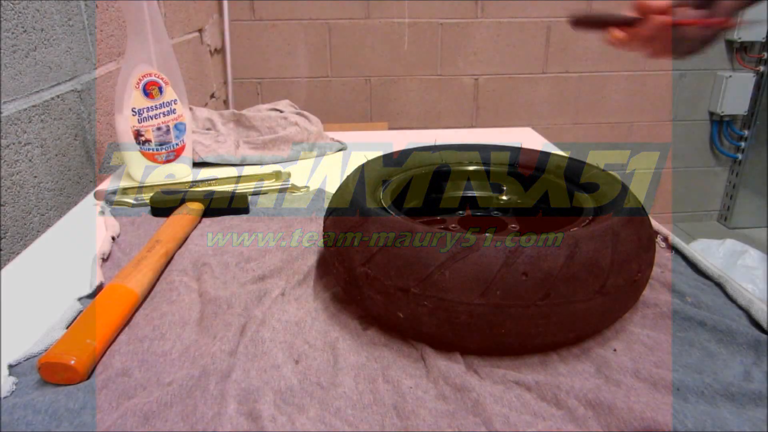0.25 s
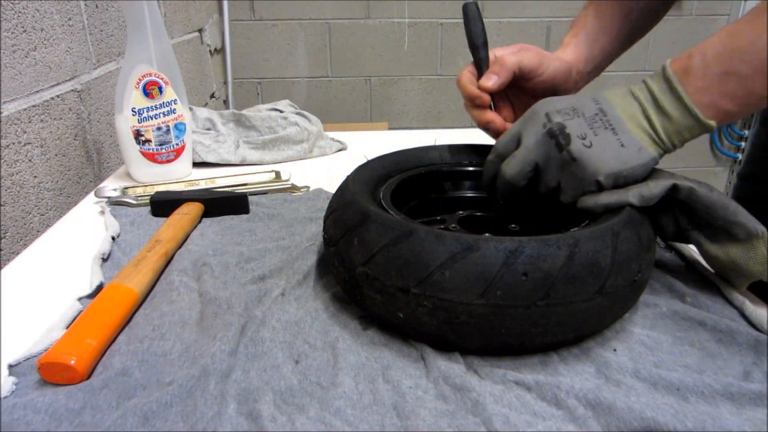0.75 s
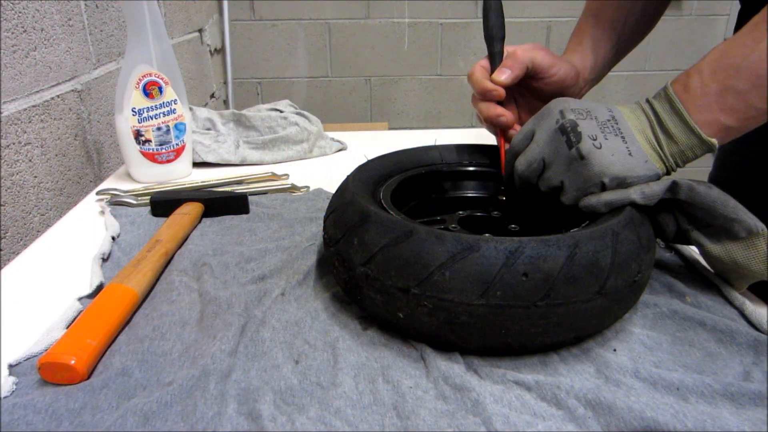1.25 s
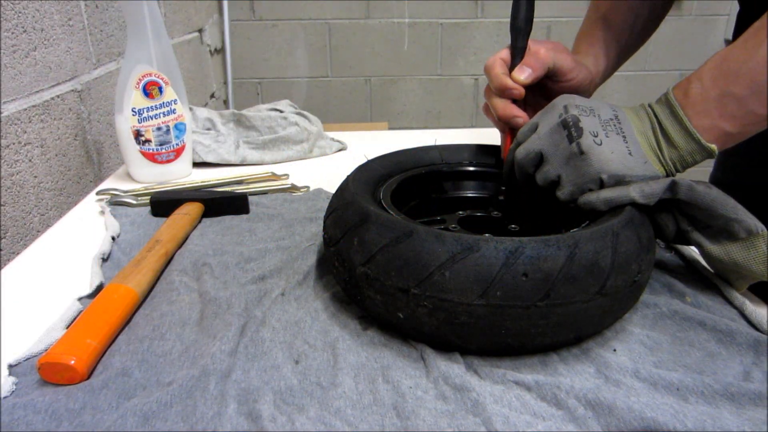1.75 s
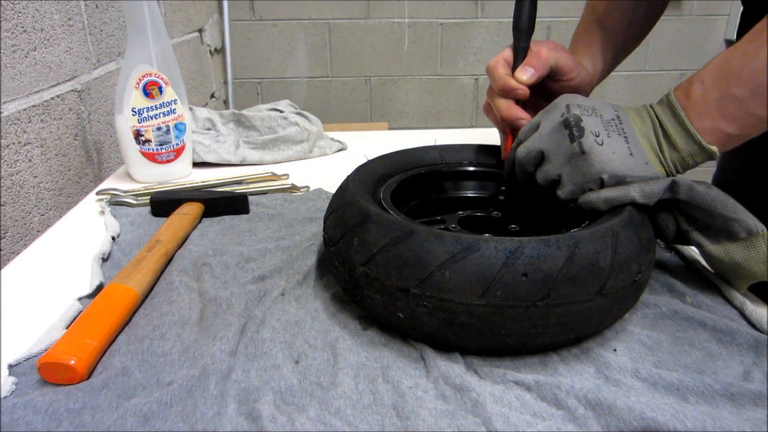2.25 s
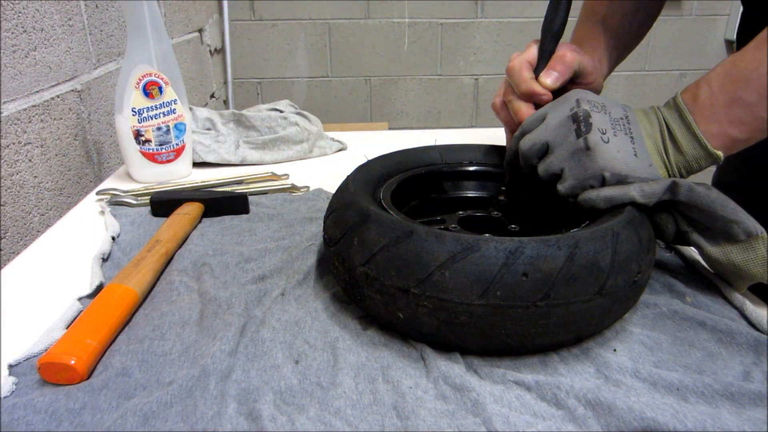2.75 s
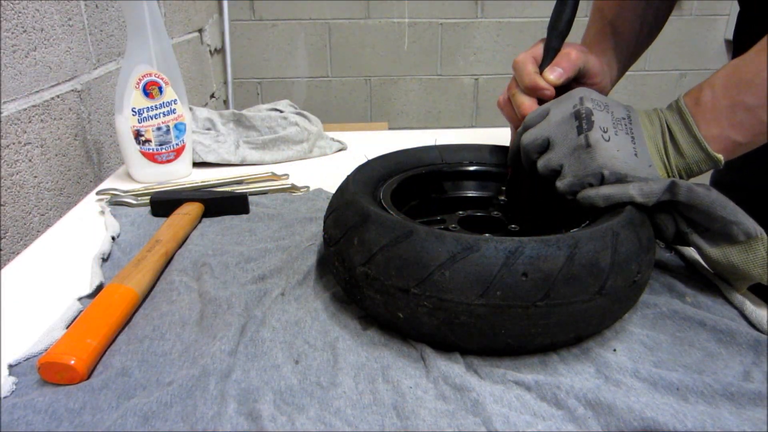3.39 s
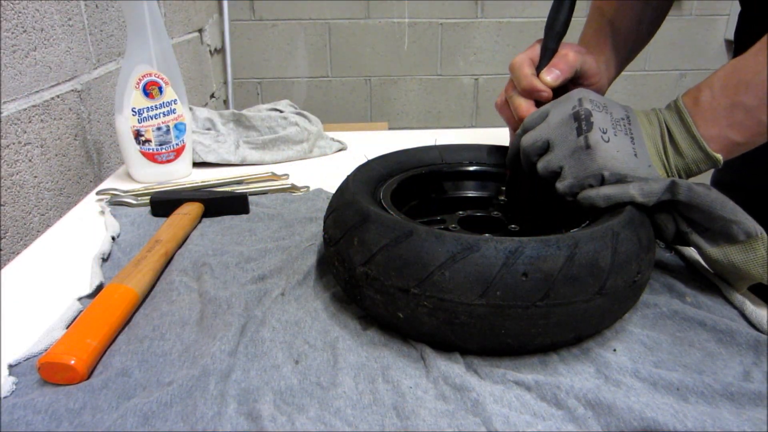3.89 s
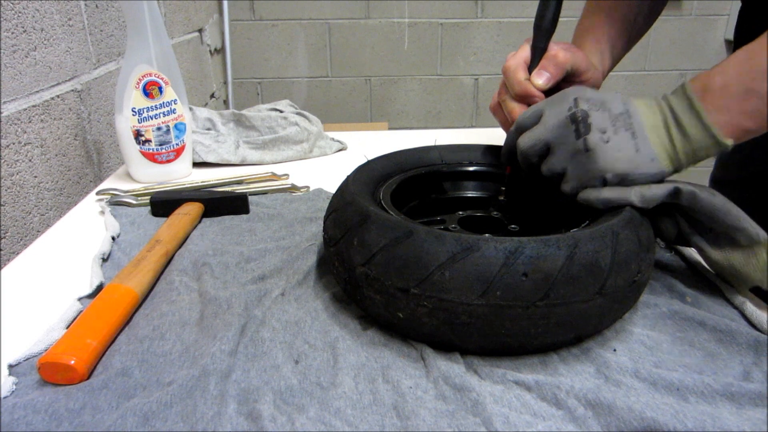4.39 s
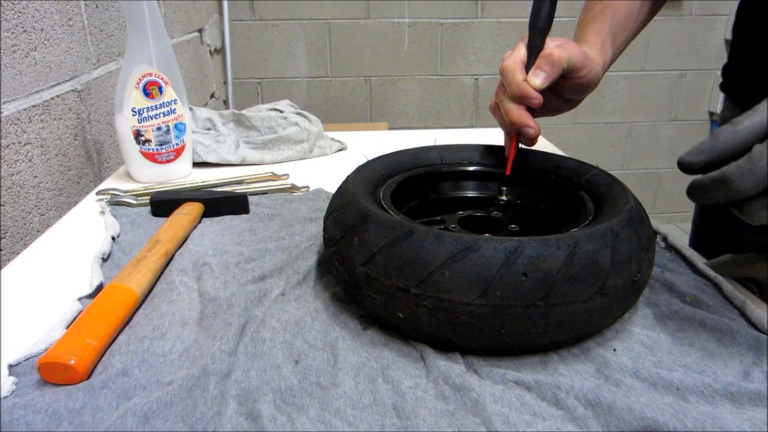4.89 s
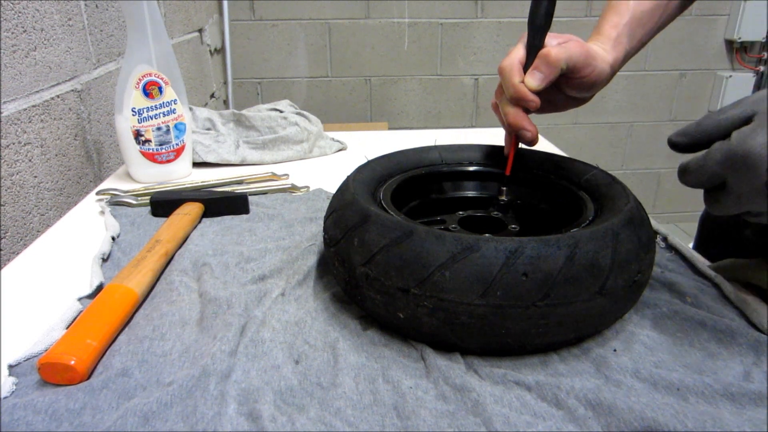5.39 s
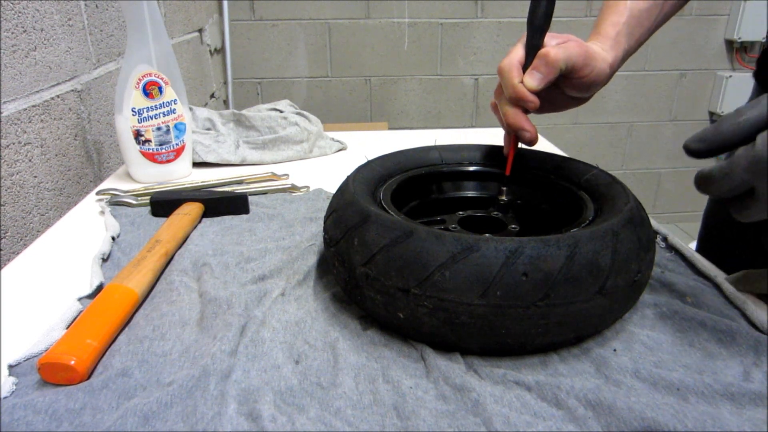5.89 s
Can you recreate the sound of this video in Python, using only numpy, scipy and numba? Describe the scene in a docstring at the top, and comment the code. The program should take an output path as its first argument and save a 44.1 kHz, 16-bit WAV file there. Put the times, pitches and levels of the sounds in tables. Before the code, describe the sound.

Low ventilation hum, a soft rustle, a hard double knock on a metal rim, then a squeezed hiss and a long rush of escaping air.

```python
"""Ventilation rushes and hums throughout, as filtered noise and wavering sines; cloth rustles first, as noise.
At 0.7 s a tool knocks on the wheel of a small tyre: cracks, rattle, thuds and ringing rim modes. Small noise
ticks accompany the first contacts and follow the loud knock, as the tool touches wheel and valve; that knock
makes the recorder turn its gain down for a moment. Air spits at 1.8 s, hisses past the tool from 2.1 s while the
core is unscrewed, then blows freely from 3.75 s: turbulence noise through a moving resonant high-pass."""
import sys
import numpy as np
from scipy import signal
from scipy.fft import rfft, irfft
from scipy.io import wavfile
from scipy.ndimage import uniform_filter1d
from numba import njit

SR = 44100
rng = np.random.default_rng(int(sys.argv[2]) if len(sys.argv) > 2 else 0)


def output_pcm(signal):
    """Save a mono or channel-first signal as 16-bit PCM at the path in sys.argv[1].

    Samples are clipped to [-1, 1] before scaling.
    """
    pcm = np.clip(np.atleast_2d(signal).T, -1, 1) * 32767
    wavfile.write(sys.argv[1], SR, np.round(pcm).astype(np.int16))


N = 270774
TIME = np.arange(N) / SR   # s
FREQS = np.maximum(np.fft.rfftfreq(N, 1 / SR), 1)   # Hz
SIDES = np.array([[1], [-1]])   # left, right

# Ventilation rush. Each row: frequency in Hz, relative density in dB per Hz.
AIR_SPECTRUM = [(25, -23.5), (45, -20.5), (70, -9), (92, -8.5), (145, -1.5), (263, -13), (500, -18),
                (750, -21), (1400, -26), (2500, -40), (4500, -49.5), (8000, -55.5), (10000, -63),
                (16000, -69)]
# Mains and fan tones. Each row: frequency in Hz, rms level in dB, unsteadiness from 0 to 1.
HUM_TONES = [(99.6, -36.5, 0.06), (141.35, -34.5, 0.37), (242.8, -52.5, 1), (399.6, -51, 0)]
# Sleeves and gloves moving in. Each row: fully on in s, stops in s, 60 dB rise time in s, level in dB.
CLOTH_MOVES = [(.08, .11, .9, -57), (.25, .34, 0.072, -46), (0.688, .8, .45, -52)]
# Cloth noise. Each row: frequency in Hz, relative density in dB per Hz.
CLOTH_SPECTRUM = [(400, -11), (1200, -10), (1800, 1), (2600, -11), (4000, -20.5), (7000, -22.5),
                  (10000, -32), (16000, -40.5)]
# Contacts with the wheel. Each row: start in s, strength in dB, softness as low-pass in Hz.
WHEEL_CONTACTS = [(0.72, -16.5, 760), (.742, -27.5, 540), (.832, -5.5, 3400), (.853, -3, 1840),
                  (0.8642, -4, 2190), (0.875, -4.5, 2280)]
# Ringing modes of the wheel. Each row: frequency in Hz, relative level in dB, t60 in s.
WHEEL_MODES = [(296, -9, 0.32), (396, -14.5, 0.16), (467, -12, .25), (534, -0.5, 0.225), (624, -3.5, 0.22),
               (762, 4.5, 0.17), (852, -14.5, 0.47), (1050, -9, 0.15), (1180, 3, 0.11), (1240, 4, 0.2),
               (1317, -7.5, 0.29), (1350, -8.5, 0.49), (1464, 4, 0.13), (1516, 6.5, 0.21), (1580, 4, 0.31),
               (1544, -3, 0.23), (1713, -4.5, .25), (1770, -5.5, 0.17), (2130, -18, 0.28),
               (2370, -15, 0.23), (2700, -23.5, 0.45), (2960, -9, .26), (2940, -17.5, 0.24),
               (3252, -15, .3), (4097, -29.5, .22), (4850, -8, 0.38), (7150, -9, .27)]
# Tool touching wheel and valve. Each row: start in s, relative level in dB, upper band edge in Hz.
TOOL_TICKS = [(0.7294, -23, 10800), (.741, -30, 9000), (0.936, -24, 10000), (0.958, -31, 10000),
              (1.0612, -26, 6960), (1.07, -24, 7000), (1.077, -22, 7460), (1.262, -37, 6950)]
# Spit, half-open hiss, free blow. Each row: fully on in s, shuts in s, 60 dB rise time in s,
# 60 dB fall time in s, relative level in dB, sag in dB per s (negative grows).
AIR_RELEASES = [(1.785, 1.825, .095, .04, -40, -9), (2.138, 3.204, 0.096, .02, -27.5, -1),
                (3.751, 6.15, 0.021, .02, -25.5, 2.5)]
# Jet turbulence. Each row: frequency in Hz, relative density in dB per Hz.
JET_SPECTRUM = [(500, -14), (1100, -12.5), (1500, -10), (2100, -10), (2600, -7), (3500, -9), (5500, -7),
                (7000, -6.5), (8700, -1), (9700, 1.5), (10300, -3.5), (11000, 1.5), (13000, 1), (14100, 1),
                (16000, -8)]
# Peaks and hollows of the valve stem and rim dish. Each row: frequency in Hz, width in Hz, gain in dB.
STEM_RESONANCES = [(1020, 150, -3), (1550, 180, -4), (1880, 110, 6.5), (2090, 120, 2), (2250, 150, -5),
                   (2700, 350, 1), (3500, 300, -2), (3900, 250, 2), (4540, 260, 4), (5280, 220, 4),
                   (5900, 350, 2), (6870, 200, -3), (7190, 130, 3), (8000, 220, 5), (8340, 130, -4),
                   (8750, 250, 2), (9350, 600, 3), (10220, 250, -4), (10800, 400, 2)]
# Gap between valve, tool and glove; it narrows and widens again as the core is unscrewed.
# Each row: time in s, pitch in Hz, quality factor.
UNSCREWING_GAP = [(2.15, 2720, 0.77), (2.25, 3240, 1.56), (2.55, 3480, 1.4), (2.63, 4500, 0.68),
                  (2.69, 5060, 1.95), (3.07, 5320, 1.65), (3.105, 4070, 1.3), (3.15, 3230, 1.02),
                  (3.2, 2730, 1.1)]
# It closes briefly as the core comes free, then stays wide and rings less while the glove lets go.
# Each row: time in s, pitch in Hz, quality factor.
BLOWING_GAP = [(3.81, 2730, 0.56), (3.845, 5020, 1.1), (3.87, 2040, 0.83), (3.97, 1790, 1.3),
               (4.6, 1880, 1.46), (4.67, 1530, .7), (4.95, 1803, 1.08), (6.14, 1600, 1.3)]
# Hands steering the jet. Each row: time in s, shift to the left in dB, gain above 12 kHz in dB.
JET_AIM = [(2.1, -.7, -2.5), (2.55, 0.5, 1.5), (2.63, -1, -4), (3.05, 3, -2), (3.8, 0.5, -3),
           (4.0, 1.5, -4), (5.0, -0.5, -6)]
# Early echoes off rim, bench and wall. Each row: delay in s, gain in dB.
EARLY_ECHOES = [(.0033, -28), (.0047, -30.5), (.0071, -20.5), (0.011, -22.5)]
# Reverberation time. Each row: frequency in Hz, t60 in s.
ROOM_DECAY = [(100, 0.62), (1000, 0.35), (4000, 0.41), (8000, 0.25), (16000, 0.15)]
# Stereo balance. Each row: frequency in Hz, left minus right in dB.
STEREO_BALANCE = [(60, -7.5), (200, -8.5), (380, -10.5), (700, -9), (1300, -8), (2400, -6), (4400, -4.5),
                  (8100, -4.5), (15000, -8)]
# A tighter gap throws a stronger jet.
SQUEEZE_DB_PER_OCTAVE, RESTING_GAP_HZ = 4, 2700


def from_db(db):
    """Decibels to amplitude gain."""
    return 10 ** (np.asarray(db) / 20)


def rms_one(x):
    """Scale to unit power."""
    return x / np.sqrt(np.mean(x ** 2) + 1e-20)


def in_time(rows):
    """Interpolate each column of a curve at every sample."""
    s, *columns = np.transpose(rows)
    return [np.interp(TIME, s, column) for column in columns]


def at_hz(points, hz):
    """Read a curve on a log-frequency axis."""
    at, value = np.transpose(points)
    return np.interp(np.log(hz), np.log(at), value)


def butter(x, hz, kind, order=2):
    """Causal Butterworth filter."""
    edges_hz = np.clip(hz, 10, .45 * SR)
    return signal.sosfilt(signal.butter(order, edges_hz, kind, fs=SR, output="sos"), x + 1e-18)


def noise(spectrum_db):
    """Gaussian noise of unit power, shaped by a spectrum in dB."""
    spectrum = rfft(rng.standard_normal(N)) * from_db(spectrum_db)
    return rms_one(irfft(spectrum, N))


def drift(corner_hz):
    """Slow random wander of unit spread."""
    return noise(-20 * np.log10(1 + (FREQS / corner_hz) ** 2))


def burst(s, t60_s):
    """Envelope that jumps up at time s and decays exponentially."""
    return (TIME >= s) * from_db(-60 * np.abs(TIME - s) / t60_s)


def swell(on_s, off_s, rise_s, fall_s):
    """Envelope that climbs 60 dB in rise_s, holds from on_s to off_s and drops 60 dB in fall_s."""
    before = np.maximum(on_s - TIME, 0) / rise_s
    after = np.maximum(TIME - off_s, 0) / fall_s
    return from_db(-60 * (before + after))


def workshop(x, wet_db):
    """Direct sound, early echoes and a diffuse tail that dies band by band, partly alike left and right."""
    t, tail = TIME[:SR // 2], 0
    edges_hz = np.geomspace(60, 19000, 10)
    for low, high in zip(edges_hz, edges_hz[1:]):
        mid, side = butter(rng.standard_normal((2, len(t))), [low, high], "band")
        t60_s = at_hz(ROOM_DECAY, np.sqrt(low * high))
        tail = tail + (mid + from_db(-3.0) * side * SIDES) * from_db(-60 * t / t60_s)
    response = from_db(wet_db) * rms_one(tail * (t > .004)) / np.sqrt(len(t))
    for delay_s, db in EARLY_ECHOES:
        response[:, round(delay_s * SR)] += from_db(db)
    return x + signal.fftconvolve(x[None], response, axes=1)[:, :N]


def ventilation(rush_db=-32.5, side_db=-13, rumble_db=-57):
    """Dull broadband rush, deep rumble that differs from side to side, mains hum and wavering fan tones."""
    colour = at_hz(AIR_SPECTRUM, FREQS)
    side_tilt_db = np.clip(3 * np.log2(FREQS / 200), -3, 5)
    rush = noise(colour) + from_db(side_db) * noise(colour + side_tilt_db) * SIDES
    rumble = rms_one(butter(rng.standard_normal((2, N)), [20, 90], "band"))
    hum = 0
    for hz, db, unsteady in HUM_TONES:
        # complex wander moves both amplitude and phase
        waver = 1 + unsteady * (drift(1.84) + 1j * drift(0.83))
        waver = waver / np.sqrt(1 + 2 * unsteady ** 2)
        carrier = np.exp(2j * np.pi * (hz * TIME + rng.random()))
        hum = hum + np.sqrt(2) * from_db(db) * np.real(waver * carrier)
    return from_db(rush_db) * rush + from_db(rumble_db) * rumble + hum


def rustle(fall_s=0.77):
    """Cloth friction: coloured noise that swells and fades with each movement."""
    motion = sum(from_db(db) * swell(on, off, rise, fall_s) for on, off, rise, db in CLOTH_MOVES)
    return workshop(motion * noise(at_hz(CLOTH_SPECTRUM, FREQS)), wet_db=-5)


def wheel(ring_db=-11, crack_db=12, crack_t60_s=0.0088, rattle_db=-6.5, rattle_t60_s=0.25,
          thud_db=-6, thud_t60_s=0.32):
    """Each contact gives a short crack, a rattle and a tyre thud, and sets the rim modes ringing."""
    out, t = np.zeros(N), TIME[:SR]
    ring = 0
    for hz, db, t60_s in WHEEL_MODES:
        ring = ring + rng.choice([-1, 1]) * from_db(db - 60 * t / t60_s) * np.sin(2 * np.pi * hz * t)
    # two heavily damped resonances
    crack = sum(from_db(db) * np.cos(2 * np.pi * hz * t) for hz, db in [(1050, -5), (2000, -6)])
    crack = crack * from_db(-60 * t / crack_t60_s)
    for s, db, soft_hz in WHEEL_CONTACTS:
        rattle = rms_one(butter(rng.standard_normal(SR), [900, 2600], "band"))
        rattle = rattle * from_db(-60 * t / rattle_t60_s)
        thud = rms_one(butter(rng.standard_normal(SR), [200, 600], "band"))
        thud = thud * from_db(-60 * t / thud_t60_s)
        blow = from_db(ring_db) * ring + from_db(crack_db) * crack + from_db(rattle_db) * rattle
        # a soft contact presses longer, so more of it goes into the thud
        thud_gain = from_db(thud_db) * 600 / soft_hz
        at = round(s * SR)
        out[at:at + SR] += from_db(db) * (butter(blow, soft_hz, "low") + thud_gain * thud)
    return workshop(out, wet_db=-8.5)


def ticks(t60_s=0.0067, gain_db=-7):
    """Small contacts of the tool with wheel and valve: band-limited noise bursts."""
    white = rng.standard_normal(N)
    out = np.zeros(N)
    for s, db, top_hz in TOOL_TICKS:
        grain = rms_one(butter(white, [2600, top_hz], "band"))
        out += from_db(db + gain_db) * burst(s, t60_s) * grain
    return workshop(out, wet_db=-5)


def airflow(gap_hz):
    """Each release swells, sags or grows, and shuts; a tight gap strengthens the jet."""
    flow = 0
    for on, off, rise, fall, db, sag in AIR_RELEASES:
        level_db = db - sag * np.maximum(TIME - on, 0)
        flow = flow + swell(on, off, rise, fall) * from_db(level_db)
    return flow * from_db(SQUEEZE_DB_PER_OCTAVE * np.log2(gap_hz / RESTING_GAP_HZ))


@njit
def resonant_highpass(x, step, quality):
    """State-variable high-pass whose pitch and sharpness move: the gap rings and weakens what lies below."""
    out, band, low = np.zeros(len(x)), 0., 0.
    for i in range(len(x)):
        g, loss = step[i], 1 / quality[i]
        out[i] = (x[i] - (loss + g) * band - low) / (1 + g * (g + loss))
        low += 2 * g * (band + g * out[i])
        band += 2 * g * out[i]
    return out


def jet(colour, gap_hz, quality, lift_db, leak_db=-6.0, level_db=0.5):
    """Turbulence forced through the gap, plus a dull leak round it; the flow sets its bright strength."""
    step = np.tan(np.pi * gap_hz / SR)
    past_gap = noise(colour)
    for _ in range(2):   # two stages: steep below the pitch
        past_gap = resonant_highpass(past_gap, step, quality)
    hiss = past_gap + from_db(leak_db) * butter(noise(colour), 5100, "low")
    treble = irfft(rfft(hiss) * (FREQS > 12000), N)
    hiss = hiss + (from_db(lift_db) - 1) * treble
    # hold the bright core to the flow, whatever the gap does below it
    core = np.sqrt(uniform_filter1d(butter(hiss, [7000, 11000], "band") ** 2, size=2000))
    return hiss / core * airflow(gap_hz) * from_db(level_db)


def valve(flutter_db=0.5, spread_db=-12):
    """Escaping air: jet turbulence coloured by the stem and by the changing gap, steered by the hands."""
    colour = at_hz(JET_SPECTRUM, FREQS)
    for hz, width_hz, db in STEM_RESONANCES:
        colour = colour + db / (1 + (2 * (FREQS - hz) / width_hz) ** 2)
    gap_hz, quality = in_time(UNSCREWING_GAP + BLOWING_GAP)
    pan_db, lift_db = in_time(JET_AIM)
    flutter = from_db(flutter_db * drift(39))
    centre = workshop(jet(colour, gap_hz, quality, lift_db) * flutter, wet_db=-10.5)
    # the jet is spread out, so part of its noise differs between the microphones
    spread = from_db(spread_db) * jet(colour, gap_hz, quality, lift_db) * SIDES
    return (centre + spread) * from_db(pan_db * SIDES / 2)


def scene():
    """All sources, heard more strongly on the right."""
    both = ventilation() + rustle() + wheel() + ticks() + valve()
    ratio = from_db(at_hz(STEREO_BALANCE, FREQS))
    gains = np.array([2 * ratio, 2 + 0 * ratio]) / (1 + ratio)
    return irfft(rfft(both) * gains, N)


def gain_control(x, threshold_db=-5, release_s=0.4, attack_s=0.0042):
    """Peaks over the threshold pull the gain down fast; it creeps back."""
    peak_db = 20 * np.log10(np.abs(x).max(axis=0) + 1e-9)
    excess_db = np.maximum(peak_db - threshold_db, 1e-6)
    # peak hold with exponential release, as a running maximum in the log domain
    held_db = np.exp(np.maximum.accumulate(np.log(excess_db) + TIME / release_s) - TIME / release_s)
    pole = np.exp(-1 / (attack_s * SR))
    return x * from_db(-signal.lfilter([1 - pole], [1, -pole], held_db))


def record(dry, notch_hz=11950, notch_quality=5, cutoff_hz=15750):
    """Microphone with a treble notch, then gain control, overload clipping and a steep low-pass."""
    notch = signal.iirnotch(notch_hz, notch_quality, fs=SR)
    heard = signal.lfilter(*notch, signal.lfilter(*notch, dry))
    limited = np.clip(gain_control(heard), -1, 1)
    return signal.sosfilt(signal.ellip(12, .1, 80, cutoff_hz, fs=SR, output="sos"), limited)


dry = scene()
out = record(dry)
output_pcm(out)
```